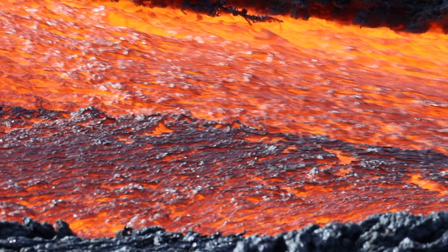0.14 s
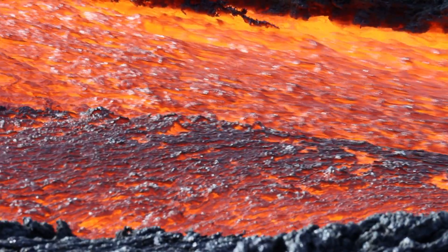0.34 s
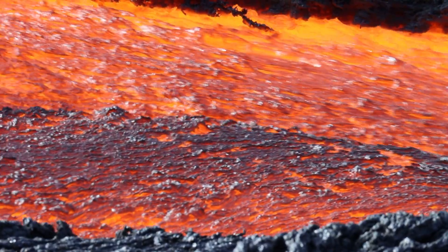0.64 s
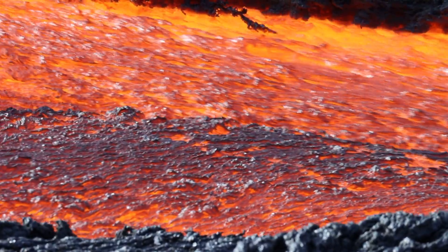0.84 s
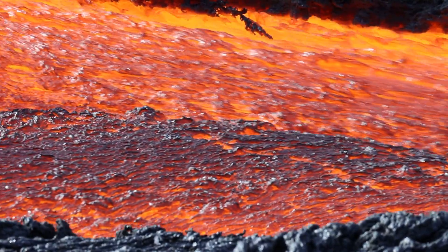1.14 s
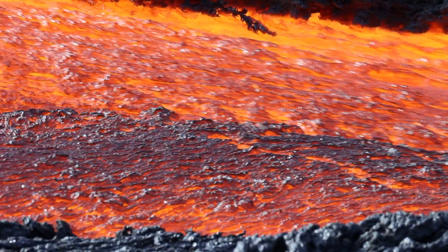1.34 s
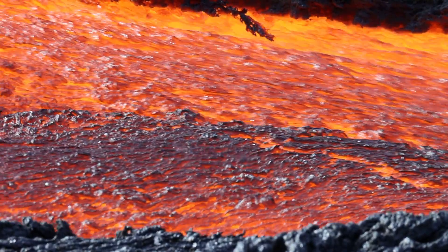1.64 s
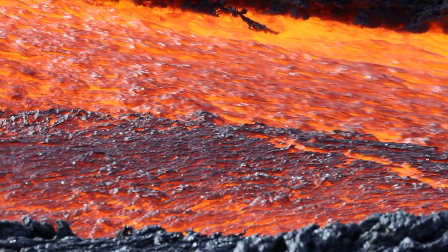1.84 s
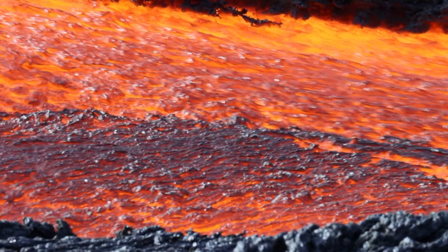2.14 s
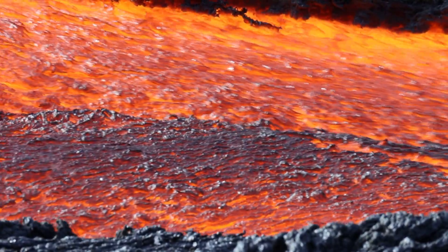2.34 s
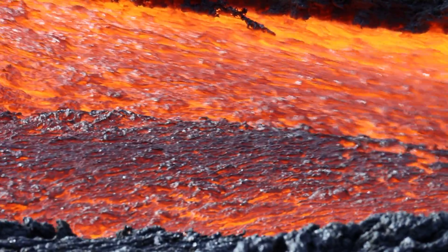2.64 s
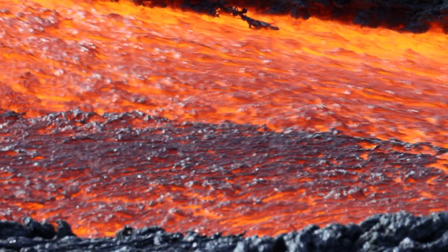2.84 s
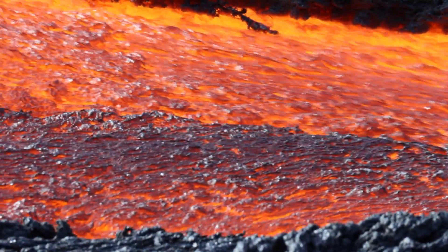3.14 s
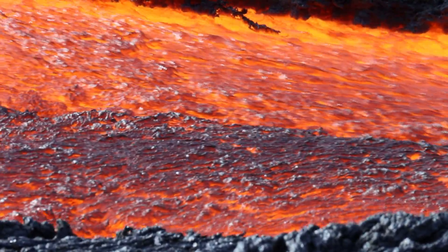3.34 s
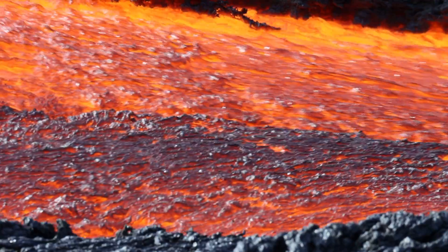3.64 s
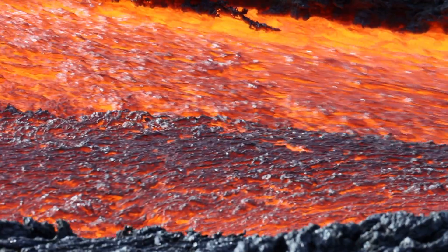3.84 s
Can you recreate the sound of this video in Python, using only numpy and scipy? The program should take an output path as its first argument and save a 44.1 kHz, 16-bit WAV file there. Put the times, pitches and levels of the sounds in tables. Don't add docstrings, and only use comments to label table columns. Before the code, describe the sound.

Gusty wind rumbles low against an outdoor microphone, fluttering unevenly, with a faint lava stream roar behind. Cooling crust sizzles finely, with sharp ticks and snaps clustered at 0-0.4 and 1-1.8 seconds, sparser around 2-2.8. A gust and light slaps hit near 2.95. From 3.6 the wind and roar swell strongly to the end, with hard slaps at 3.7 and 3.86, a loud crack at 3.8, and tiny glassy ticks.

```python
import sys
import numpy as np
from scipy import signal
from scipy.fft import rfft, irfft
from scipy.io import wavfile
from scipy.ndimage import uniform_filter1d

SR = 44100
rng = np.random.default_rng(int(sys.argv[2]) if len(sys.argv) > 2 else 0)


def materialize(psi):
    bounded = np.clip(np.atleast_2d(psi).T, -1, 1)
    quanta = np.round(bounded * 32767).astype(np.int16)
    wavfile.write(sys.argv[1], SR, quanta)


def boost(x):
    u = np.asarray(x, float) / 20
    return 10 ** u


N = 176400


def read(points, hz):
    f, value = np.transpose(points)
    return np.interp(np.log(hz + 1), np.log(f + 1), value)


def curve(points, t):
    return np.interp(t, *np.transpose(points))


def bumps(rows, t):
    return sum(db * np.exp(-.5 * ((t - s) / width_s) ** 2) for s, width_s, db in rows)


def evened(x):
    return x / np.sqrt(np.mean(x ** 2) + 1e-20)


def lowpass(x, hz, order):
    return signal.sosfiltfilt(signal.butter(order, hz, fs=SR, output="sos"), x)


def drift(hz):
    return evened(signal.sosfilt(signal.butter(2, hz, fs=SR, output="sos"), rng.standard_normal(N)))


def noise(colour_db, patch_db):
    hz = np.fft.rfftfreq(1024, 1 / SR)[:, None]
    t = np.arange(N // 256 + 5) * 256 / SR
    real, imaginary, patch = rng.standard_normal((len(t), 513, 3)).T
    size = boost(colour_db(hz, t) + 0 * t)
    size = size / np.sqrt((size ** 2).sum(0))
    patch = uniform_filter1d(patch, size=10, axis=0)
    patch = evened(uniform_filter1d(patch, size=8, axis=1))
    spectra = (real + 1j * imaginary) * size * boost(patch_db * patch)
    return evened(signal.istft(spectra, nperseg=1024, noverlap=768)[1][:N])


def steadied(x):
    width = round(.05 * SR)
    power = abs(uniform_filter1d(uniform_filter1d(x ** 2, width), width))
    slow = abs(uniform_filter1d(power, 8 * width))
    return x * (slow / power) ** (.7 / 2)


def snap(hz, cycles):
    u = np.arange(256) / SR * hz
    x = u * np.exp(-2 * u / cycles) * np.sin(2 * np.pi * u)
    return x / abs(x).max()


def strikes(rows):
    tail_db, tail_s = -22, .0069
    echo_db, echo_s = -15, .002
    out = np.zeros(N + 2000)
    t = np.arange(800) / SR
    for s, db, hz in rows:
        octave = np.log2(hz / 1500)
        one = snap(hz, .8 + .42 * octave)
        drive = boost(tail_db) * rng.standard_normal(800) * np.exp(-t / tail_s) * np.sqrt(hz / SR)
        drive[0] += 1
        drive[round(echo_s * SR)] += boost(echo_db)
        gain_db = 2.5 - 4 * max(octave - 1, 0)
        x = np.convolve(drive, one) * boost(db + gain_db)
        at = max(round((s - .7 / hz) * SR), 0)
        out[at:at + len(x)] += x
    return out[:N]


# start_s [s], level_db [dB]
FLOW = [(0, -61.5), (.6, -64), (1.5, -68.5), (2.2, -57), (2.7, -56.5), (3.3, -60), (3.57, -56.5),
        (3.65, -46), (4, -47.5)]
# frequency_hz [Hz], level_db [dB per Hz]
ROAR = [(150, 4), (400, -4), (900, -4), (1600, -9.5), (3000, -20), (5000, -24), (9000, -44)]


def roar():
    churn_db, churn_hz = 1.84, 30
    t = np.arange(N) / SR
    db = curve(FLOW, t) + .33 * bumps(BUFFETS, t) + churn_db * drift(churn_hz)
    return boost(db) * noise(lambda hz, t: read(ROAR, hz), patch_db=-1)


# start_s [s], level_db [dB]
CRUST = [(0.0, -61.5), (0.09, -63), (0.56, -68), (0.82, -66.5), (1.18, -63.5), (1.64, -65.5), (1.87, -69),
         (2.25, -75), (2.44, -74), (2.85, -67.5), (2.96, -62), (3.26, -70), (3.53, -71.5), (3.92, -64),
         (4.0, -65)]
# frequency_hz [Hz], level_db [dB per Hz]
SIZZLE = [(300, 13), (700, -2), (1500, -4.5), (3000, -7.5), (6500, -5.5), (11000, -7), (15500, -9)]
# start_s [s], width_s [s], extra_db [dB]
CRUMBLES = [(.01, 0.014, 3), (.055, 0.013, 7), (.085, 0.0078, 9.5), (.125, 0.0054, 1), (.272, 0.02, 9),
            (.305, .008, 2), (.347, 0.006, 7), (.52, 0.014, 6), (.545, 0.0044, 6), (1.087, 0.0086, 7.5),
            (1.4, 0.019, 3.5), (1.76, 0.013, 11), (2.35, .008, 11), (2.95, 0.025, 1.5), (3.15, .01, 0),
            (3.797, .005, 15), (3.87, 0.0058, 0)]


def sizzle():
    cracks_per_s, spread_db = 2500, 3.3
    clump_db, clump_hz = 1.8, 18
    t = np.arange(N) / SR
    db = curve(CRUST, t)

    hiss_db = 5 + db.mean() + .75 * (db - db.mean())
    hiss = noise(lambda hz, t: read(SIZZLE, hz), patch_db=1.2) * boost(hiss_db)

    cracked = rng.random(N) < cracks_per_s / SR
    kind = rng.integers(0, 24, N)
    size_db = spread_db * np.minimum(rng.exponential(1, N), 3.2) + clump_db * drift(clump_hz)
    size = boost(size_db) * cracked
    cycles = rng.uniform(.7, 1.6, 24) * np.geomspace(1, 2, num=24)
    grains = np.zeros(N)
    for k, hz in enumerate(np.geomspace(900, 15000, num=24)):
        grain = signal.oaconvolve(size * (kind == k), snap(hz, cycles[k]))[:N]
        grains += boost(read(SIZZLE, hz)) * hz ** 0.48 * grain
    near = evened(grains) * boost(1.5 + db)

    crumble_db = bumps(CRUMBLES, t)
    extra = hiss * (boost(.78 * crumble_db) - 1) + near * (boost(.69 * crumble_db) - 1)
    return hiss + near + lowpass(extra, 11000, order=1)


# start_s [s], peak_db [dB], pitch_hz [Hz], length_cycles [cycles]
RINGS = [(1.0133, -44, 11700, 8), (2.1703, -56, 10300, 10), (2.5677, -53, 11200, 12),
         (3.2582, -53, 12000, 12), (3.2585, -61, 7800, 10), (3.292, -57, 3640, 8), (3.3138, -51, 11700, 6),
         (3.4086, -52, 13500, 8), (3.563, -52, 15200, 8), (3.7787, -49, 6600, 10), (3.7787, -56, 13000, 10),
         (3.9294, -40, 13600, 4), (3.9294, -47, 7600, 3)]


def rings():
    out = np.zeros(N + 256)
    for s, db, hz, cycles in RINGS:
        at = round((s - cycles / 2 / hz) * SR)
        out[at:at + 256] += boost(db) * snap(hz, cycles)
    return out[:N]


# start_s [s], peak_db [dB], pitch_hz [Hz]
DULL = [(0.1561, -39.5, 1090), (0.268, -45, 1740), (0.2981, -48.5, 2260), (0.3408, -41, 1330),
        (0.9716, -49, 2170), (1.2111, -42.5, 3540), (1.2355, -45, 2781), (1.3365, -44.5, 2200),
        (1.3778, -45, 2150), (1.6422, -44.5, 1420), (1.7519, -41.5, 1771), (2.5287, -48.5, 4000),
        (1.0915, -42.5, 900), (2.6586, -56, 3485), (3.0765, -39.5, 3900), (3.7951, -29.5, 1620)]
# start_s [s], peak_db [dB], pitch_hz [Hz]
BRIGHT = [(0.0046, -38.5, 6800), (0.0524, -44, 5473), (0.0582, -37, 10772), (0.0823, -50, 10772),
          (0.0917, -46.4, 5473), (0.1051, -43, 5473), (0.12, -40.5, 5473), (0.868, -47, 13500),
          (0.8863, -47.5, 4368), (0.9114, -52, 6800), (0.965, -41, 12200), (1.0166, -33, 10772),
          (1.047, -43, 5473), (1.0819, -54, 8596), (1.1177, -53, 8596), (1.1813, -46, 5473),
          (1.3973, -48, 4368), (1.4397, -43, 5473), (1.5008, -41.5, 4160), (1.5634, -47, 4368),
          (1.6358, -40.5, 6400), (1.7191, -46, 8596), (1.8243, -41, 7000), (1.9668, -54, 4368),
          (1.9933, -48, 6859), (2.1703, -42.5, 6900), (2.5676, -50, 5400), (2.7879, -42, 10772),
          (2.8379, -42, 8596), (2.9671, -41, 4330)]
# start_s [s], peak_db [dB], pitch_hz [Hz]
LATE_SNAPS = [(3.0602, -36, 4800), (3.0598, -54, 1800), (3.0762, -49, 1800), (3.111, -37.5, 10800),
              (3.2386, -49, 4370), (3.2913, -40, 8650), (3.5129, -44, 10800), (3.5502, -40, 10300),
              (3.6258, -49, 13500), (3.707, -38, 10700), (3.8963, -38, 10500), (3.974, -41, 11600),
              (3.7951, -37, 8600)]
# start_s [s], peak_db [dB], pitch_hz [Hz]
WEAK_DULL = [
    (0.0464, -48, 1810),
    (0.2404, -50, 1820),
    (0.31, -49, 1800),
    (0.3469, -46, 1790),
    (0.9882, -57, 1800),
    (1.0864, -57, 1800),
    (1.771, -51, 1800),
    (3.1437, -50, 1800),
    (3.1504, -49, 1800),
]
# start_s [s], band_level_db [dB], pitch_hz [Hz]
FAINT = [(0.0215, -50, 9900.0), (0.0355, -49.5, 4000.0), (0.0654, -45, 8460), (0.2225, -51, 8500.0),
         (0.2465, -49, 6300.0), (0.2883, -45.5, 5400.0), (0.3472, -56, 6300.0), (0.3953, -54, 7300.0),
         (0.4116, -52, 13500.0), (0.4622, -51, 11600.0), (0.5116, -54.5, 2900.0), (0.5169, -56, 2860),
         (0.544, -50, 7260), (0.6206, -61, 2500.0), (0.746, -58, 3400.0), (0.751, -57, 4600.0),
         (0.752, -53, 2490), (1.0776, -55, 2900.0), (1.1688, -50, 8500.0), (1.1776, -48, 7300.0),
         (1.3243, -50, 4000.0), (1.3846, -54, 8500.0), (1.4338, -52, 2500.0), (1.4829, -53, 3400.0),
         (1.5697, -52, 6300.0), (1.602, -53.5, 2480), (1.6323, -53, 6260), (1.6642, -55, 4600.0),
         (1.7056, -59, 4000), (1.7575, -54, 2900.0), (1.7655, -61, 4500), (1.8199, -51, 9900),
         (1.9403, -57.5, 2890), (1.9733, -54, 5400.0), (1.9875, -58, 7300), (2.0823, -55, 6300.0),
         (2.523, -55, 4000.0), (2.5564, -53, 6300.0), (2.5712, -53, 5400.0), (2.679, -54.5, 2460),
         (2.8535, -51.5, 4600.0), (2.911, -54, 4600), (2.943, -51, 2940), (2.9525, -51, 7300),
         (3.0137, -47, 6000), (3.0406, -46, 6300.0), (3.1506, -57, 2900.0), (3.1543, -50, 5400.0),
         (3.1838, -55, 3400.0), (3.3721, -50, 13500.0), (3.4235, -56, 13500.0), (3.5539, -44, 8500.0),
         (3.5706, -47, 13500.0), (3.6315, -47, 5400.0), (3.76, -43.5, 5400), (3.8832, -48, 5400.0),
         (3.9014, -53, 7300.0)]


def snaps():
    faint = [(s, db + 3.5, hz) for s, db, hz in FAINT]
    return strikes(list(DULL) + list(BRIGHT) + list(LATE_SNAPS) + list(WEAK_DULL) + faint)


# start_s [s], peak_db [dB], pitch_hz [Hz]
SLAPS = [
    (2.934, -42, 695),
    (2.956, -38, 690),
    (3.605, -45, 696),
    (3.658, -32, 700),
    (3.696, -25, 690),
    (3.864, -30, 696),
]


def slaps():
    return strikes(list(SLAPS))


# start_s [s], level_db [dB]
GUST = [(0.0, -46.5), (0.37, -49), (0.46, -40), (0.5, -49.5), (0.59, -38.5), (1.14, -44.5), (1.18, -37),
        (1.24, -46.5), (1.39, -37), (1.88, -40.5), (2.41, -32.5), (2.53, -48), (2.82, -40.5), (2.95, -27.5),
        (2.97, -35.5), (3.3, -37), (3.95, -22.5), (4.0, -19.5)]
# start_s [s], width_s [s], extra_db [dB]
BUFFETS = [(.2, 0.019, 7), (0.428, 0.015, 7), (0.755, 0.031, 3), (1.03, 0.015, 4.5), (1.095, 0.0084, 3.5),
           (1.33, 0.023, 1.5), (1.49, 0.032, 1.5), (1.6, 0.036, -1.5), (1.83, 0.038, 2),
           (1.706, 0.021, 2.5), (2.147, 0.021, 1.5), (2.35, 0.013, 2.5), (2.395, 0.019, 1.5),
           (2.51, 0.015, 12.5), (2.617, 0.019, 6), (2.89, 0.014, 2.5), (3.007, 0.022, 2),
           (3.12, 0.032, 1.5), (3.428, 0.037, 3), (3.506, 0.025, 3.5), (3.624, 0.011, 6), (3.695, 0.029, 4),
           (3.78, 0.034, 3.5), (3.864, 0.013, 6), (3.955, 0.011, 0.5)]
# frequency_hz [Hz], level_db [dB per Hz]
CALM = [(20, -28), (55, 5.5), (110, -0.5), (230, -7), (530, -29), (1100, -30.5), (2600, -46.5), (8000, -43)]
# frequency_hz [Hz], level_db [dB per Hz]
STRONG = [(20, -5), (55, 0.5), (100, 0), (330, -12), (770, -25), (1500, -36), (3000, -49), (8000, -59.5)]


def wind():
    calm_db, strong_db = -59, -29.5
    lag_s = .03
    lump_db, lump_hz = .6, 12
    flicker_db, flicker_hz = 1.2, 78

    def colour_db(hz, t):
        mean_db = (curve(GUST, t - lag_s) + curve(GUST, t) + curve(GUST, t + lag_s)) / 3
        strength = (mean_db - calm_db) / (strong_db - calm_db)
        return read(CALM, hz) + strength * (read(STRONG, hz) - read(CALM, hz))

    t = np.arange(N) / SR
    x = noise(colour_db, patch_db=1.3)
    low = lowpass(x, 400, order=2)
    gust_db = curve(GUST, t)
    smooth_db = uniform_filter1d(gust_db, round(3 * lag_s * SR))
    quick_db = gust_db - smooth_db + bumps(BUFFETS, t) + lump_db * drift(lump_hz)
    rumble = steadied(low) * boost(quick_db)
    rush = steadied(x - low) * boost(.5 * quick_db)
    return (rumble + rush) * boost(smooth_db + flicker_db * drift(flicker_hz))


def scene():
    return (roar() + sizzle() + rings() + snaps() + slaps() + wind())[None]


def roll_off(x):
    return signal.sosfilt(signal.butter(12, 15680, fs=SR, output="sos"), x)


# centre_hz [Hz], width_hz [Hz], level_db [dB]
DIPS = [(5300, 400, -1), (9400, 450, -2), (12750, 280, -2.3)]


def record(dry):
    low_cut_hz, edge_hz = 31, 15720
    hz = np.fft.rfftfreq(N, 1 / SR)
    dips_db = sum(db * np.exp(-.5 * ((hz - f) / width) ** 2) for f, width, db in DIPS)
    low_cut = hz ** 2 / np.sqrt(hz ** 4 + low_cut_hz ** 4)
    mix = irfft(rfft(dry) * boost(dips_db) * (hz < edge_hz) * low_cut, N)
    return roll_off(mix)


dry = scene()
out = record(dry)
materialize(out)
```